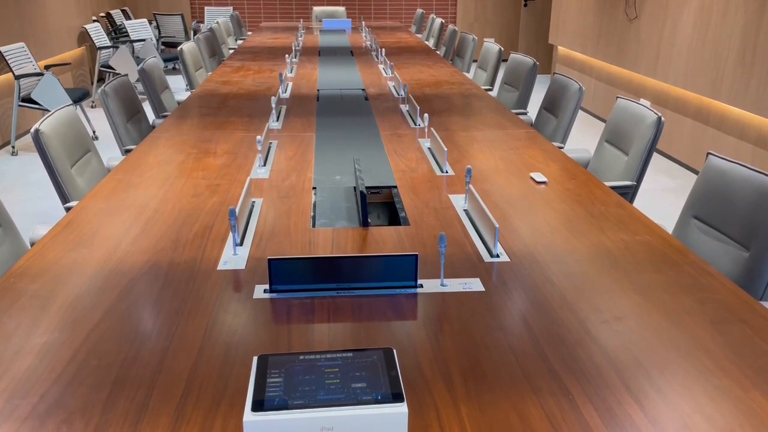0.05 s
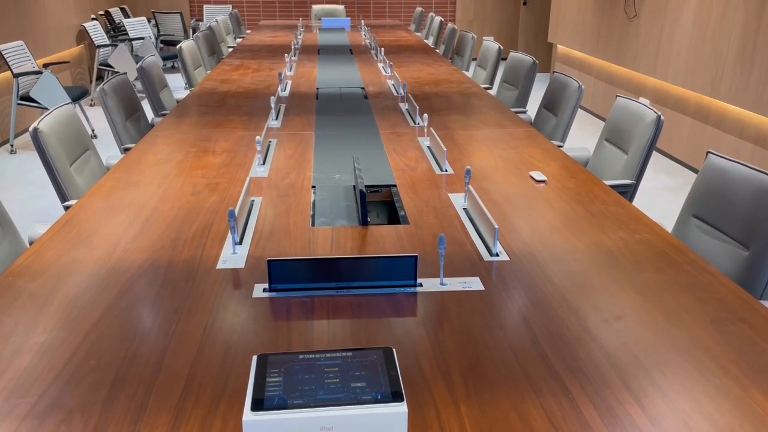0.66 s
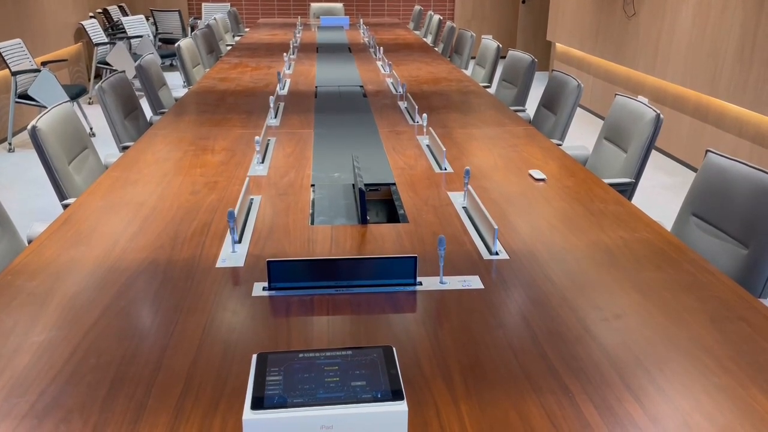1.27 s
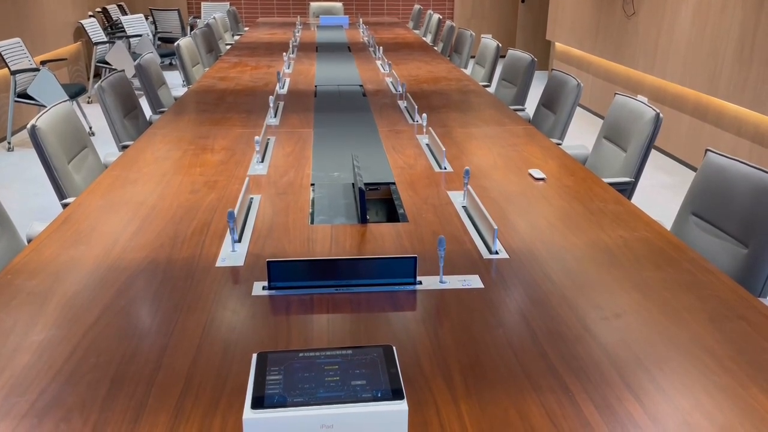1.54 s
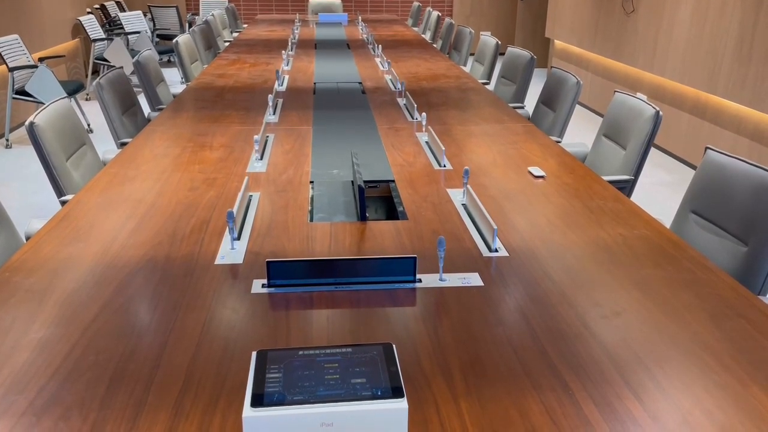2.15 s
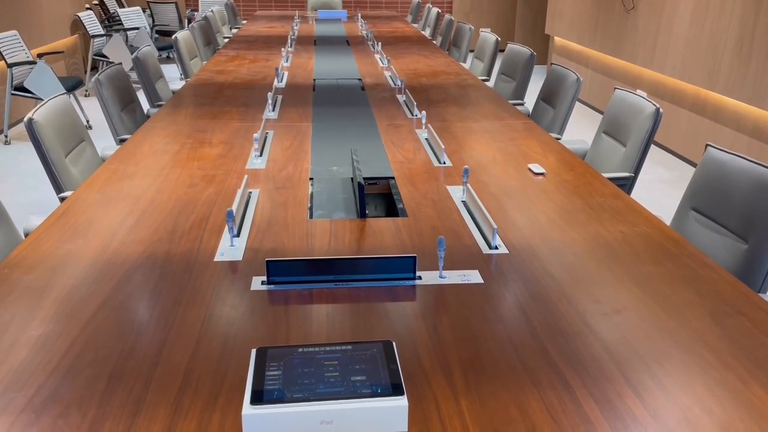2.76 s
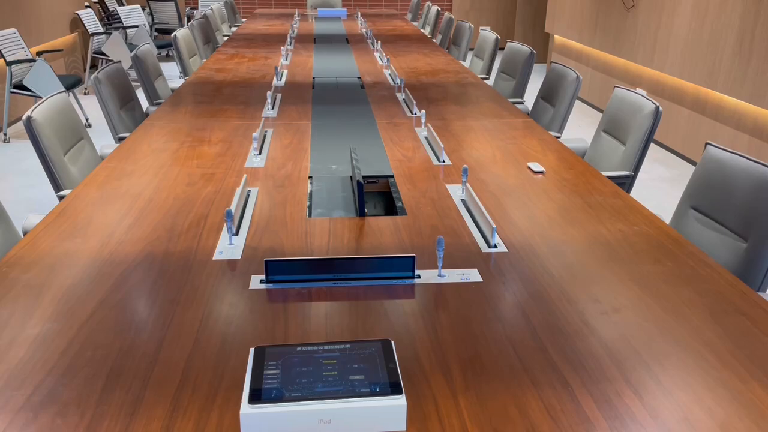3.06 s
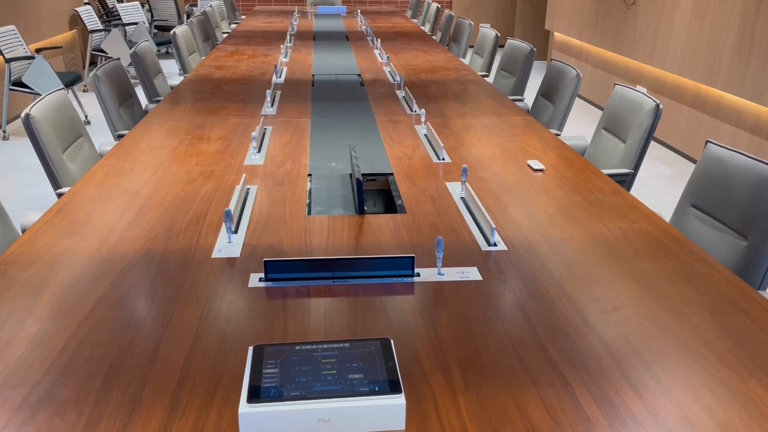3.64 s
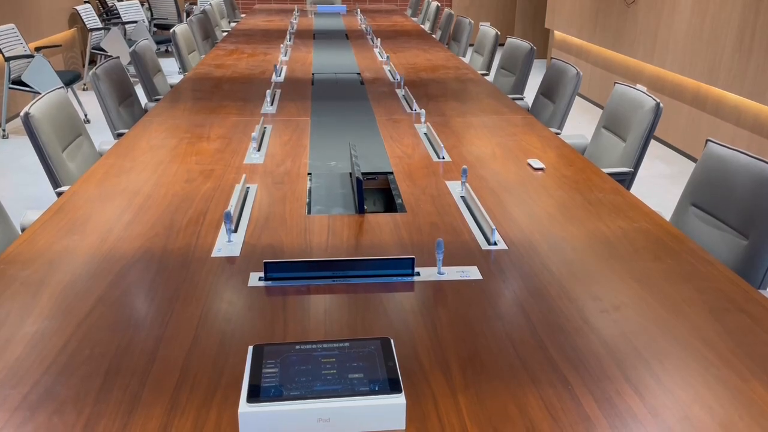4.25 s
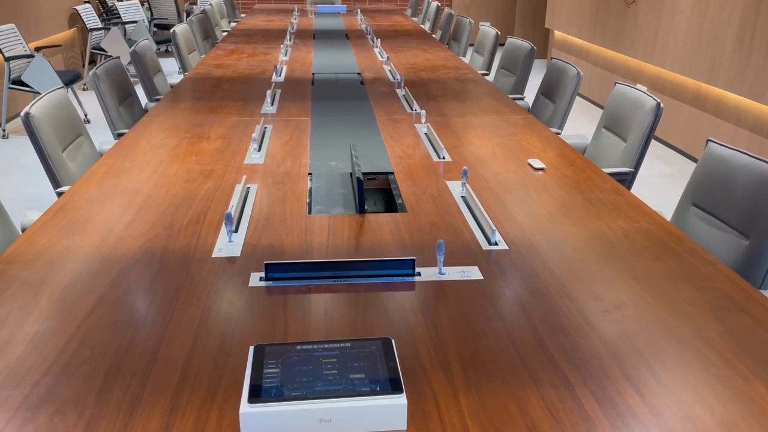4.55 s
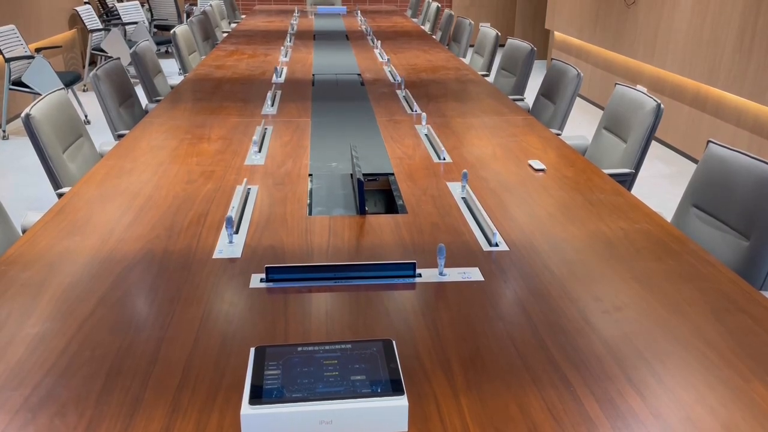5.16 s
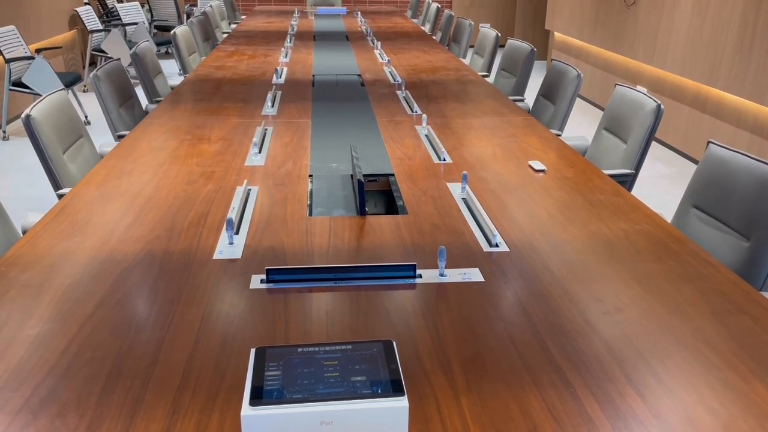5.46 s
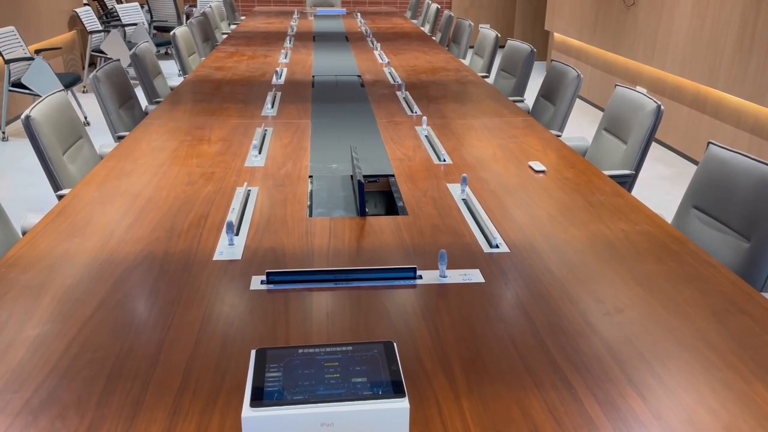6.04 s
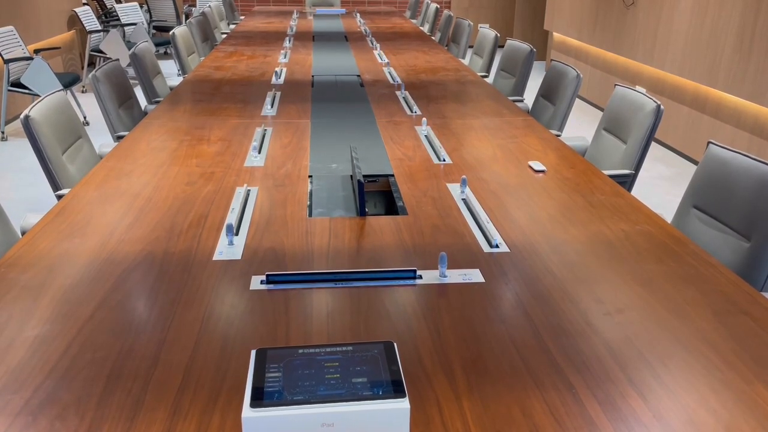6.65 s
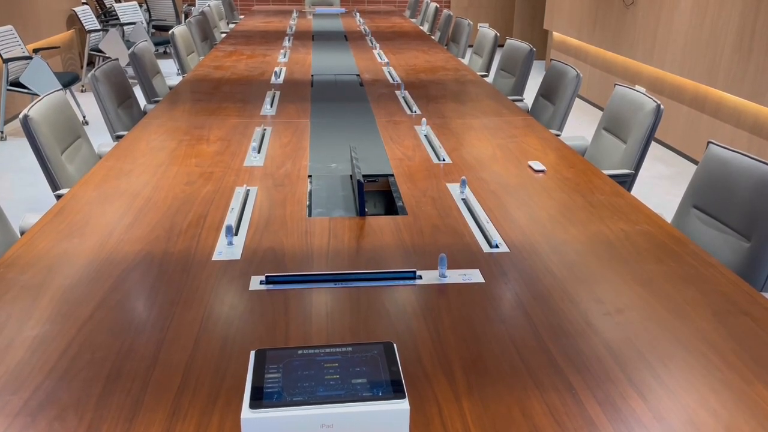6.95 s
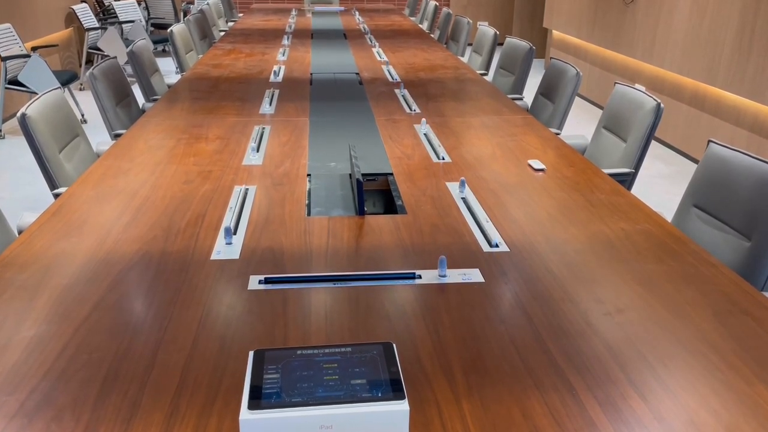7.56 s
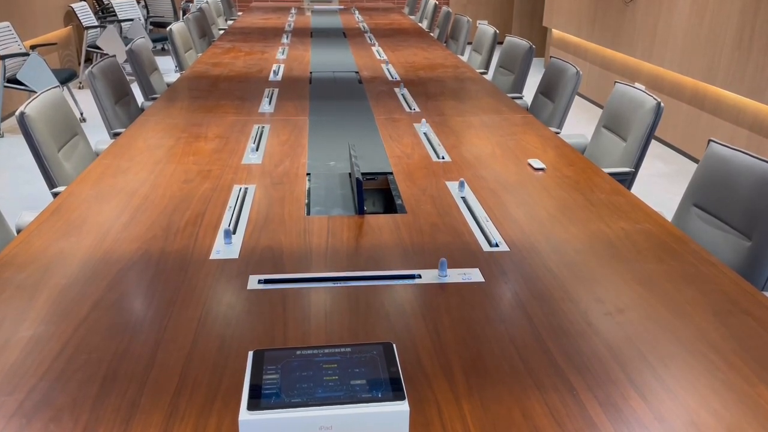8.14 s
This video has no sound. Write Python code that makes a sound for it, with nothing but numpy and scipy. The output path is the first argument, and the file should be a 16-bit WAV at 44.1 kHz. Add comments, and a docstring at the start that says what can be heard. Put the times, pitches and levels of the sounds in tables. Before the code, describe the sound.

A steady low electric hum with a faint gear whirr runs throughout as motorised screens sink into a long wooden conference table. It is heard from the head of the table in a quiet room with little echo, over softly murmuring ventilation. The hum is strongest for the first three seconds, then gradually eases, recovering slightly after 7 seconds. The panels brush faintly in their slots now and then, with one tiny squeal at about 0.7 seconds. Small bright ticks are scattered through the first half, clearest at 2.6 and 3.3 seconds. Light knocks come at about 2.4, 3.6 and 4.8 seconds. From 6.5 to 7.7 seconds a faint reedy whine sounds, breaking into a string of short squeals. The clearest knock, still soft, lands near 7.5 seconds, and a lighter one follows at 8.2 seconds while the hum continues.

```python
"""A low hum comes through a long wooden conference table in a quiet, carpeted room as screens sink into it.
Their synchronous motors turn in step with the mains, so the motor and gear tones are harmonics of one
rotation rate. Ventilation murmurs throughout. Sliding friction makes the panels brush in their slots,
and light impacts excite damped modes, heard as ticks and knocks. One brief squeal comes early; near
the end a faint reedy whine sounds for a second and breaks into short squeals."""
import sys
import numpy as np
from scipy import signal
from scipy.fft import rfft, irfft, next_fast_len
from scipy.io import wavfile

SR = 44100
rng = np.random.default_rng(int(sys.argv[2]) if len(sys.argv) > 2 else 0)


def wav_out(sig):
    """Save sig, one row per channel (or a flat mono array), as 16-bit PCM at SR to the path in sys.argv[1]."""
    wavfile.write(sys.argv[1], SR, np.round(np.clip(np.atleast_2d(sig).T, -1, 1) * 32767).astype(np.int16))


N = 366030
MAINS_HZ, TURNS_PER_S = 50, 50 / 6
ROOM_T60_S = 0.3


def from_db(db):
    """Amplitude ratio of a level in decibels."""
    return 10 ** (np.asarray(db) / 20)


def rms_one(x):
    """Normalisation to unit rms."""
    return x / np.sqrt(np.mean(x ** 2) + 1e-20)


def level_at(t, curve):
    """Linear interpolation of a curve of (t/s, level/dB)."""
    return np.interp(t, *np.transpose(curve))


def drift(rate_hz):
    """Random modulation: noise of unit rms, low-passed at rate_hz."""
    at = np.arange(0, N + 50, 50)
    hz = np.fft.rfftfreq(len(at), at[1] / SR)
    slow = irfft(rfft(rng.standard_normal(len(at))) / (1 + (hz / rate_hz) ** 2) ** 2, len(at))
    return np.interp(np.arange(N), at, rms_one(slow))


def swell(t, peak_s, length_s, attack_share=0.5):
    """Gaussian envelope of height 1, whose rise takes attack_share of its length."""
    width_s = length_s * np.where(t < peak_s, attack_share, 1 - attack_share)
    return np.exp(-((t - peak_s) / width_s) ** 2)


def tone(cycles):
    """Simple harmonic motion of unit rms and random starting phase."""
    return np.sqrt(2) * np.sin(2 * np.pi * (cycles + rng.random()))


def noise(spectrum):
    """Spectral shaping: noise that follows (f/Hz, level/dB in 1 Hz) and falls steeply outside it."""
    size = next_fast_len(N)
    hz = np.fft.rfftfreq(size, 1 / SR) + 0.00088   # the offset keeps the logarithm finite
    points, level_db = np.transpose(spectrum)
    gain = from_db(np.interp(np.log(hz), np.log(points), level_db))
    gain /= np.sqrt((1 + (points[0] / hz) ** 20) * (1 + (hz / points[-1]) ** 20))
    return irfft(rfft(rng.standard_normal(size)) * gain, size)[:N] * np.sqrt(SR / 2)


def resonance(hz, width_hz, force=None):
    """Forced vibration: one band of a force, white noise unless given, at unit rms."""
    if force is None:
        force = rng.standard_normal(N)
    band = signal.butter(2, [hz - width_hz / 2, hz + width_hz / 2], "band", fs=SR, output="sos")
    return rms_one(signal.sosfilt(band, force))


def impulses(strikes):
    """Impulsive excitation: one sample for each (t/s, level/dB)."""
    out = np.zeros(N)
    for s, db in strikes:
        out[round(s * SR)] += from_db(db)
    return out


def ringing(strikes, hz, t60):
    """Free vibration: one mode decays exponentially after each (t/s, level/dB)."""
    t = np.arange(SR // 10) / SR
    mode = from_db(-60 * t / t60) * np.sin(2 * np.pi * hz * t)
    return signal.oaconvolve(impulses(strikes), mode)[:N]


def room(x, wet_db):
    """Reverberation: a diffuse tail decays exponentially behind the direct sound."""
    t = np.arange(SR // 2) / SR
    tail = rng.standard_normal(len(t)) * from_db(-60 * t / ROOM_T60_S)
    return x + from_db(wet_db) * signal.fftconvolve(x, tail / np.linalg.norm(tail))[:N]


# main hum at four times the mains frequency, fading as the screens sink: t/s, level/dB
MAIN_HUM_CURVE = [(0, -34), (1.42, -34), (1.55, -35), (2.4, -34), (2.75, -35.3), (2.83, -36.5),
                  (2.92, -34.5), (3.55, -36.5), (3.8, -40), (4.0, -38), (4.38, -39), (4.48, -41.5),
                  (4.6, -40.5), (5.12, -42.5), (5.22, -38.5), (5.45, -45), (5.7, -43), (6.0, -46.5),
                  (6.25, -45), (6.325, -62), (6.39, -46), (6.48, -42), (6.7, -45), (7.05, -43.5),
                  (7.18, -46.5), (7.35, -40.5), (7.68, -41.5), (8.3, -39.5)]
# deep hum an octave below it: t/s, level/dB
DEEP_HUM_CURVE = [(0, -45.5), (0.5, -42), (1.0, -44.5), (1.3, -48), (1.5, -44.5), (2.0, -43.3), (2.7, -45),
                  (3.05, -42.5), (3.7, -42), (4.85, -43), (5.55, -47.5), (5.8, -44.5), (6.75, -46),
                  (7.0, -43), (7.28, -42), (7.46, -47.5), (7.62, -42.5), (7.8, -52), (7.92, -45.5),
                  (8.06, -52.5), (8.22, -45.5)]
# weaker lines of rotors and gears: order/(cycles per turn), level/dB
GEAR_LINES = [(6, -66), (8, -61), (9, -63.5), (10, -60.5), (20, -57), (30, -59), (32, -75.5), (33, -74.5),
              (34, -79.5), (36, -60.5), (40, -76), (42, -73.5), (43, -72.5), (45, -79.5), (47, -73.5),
              (48, -71), (50, -75), (60, -77), (70, -80.5)]


def motors(t, hum_gain_db=0.04, gear_gain_db=-0.2, flutter_db=-62):
    """Synchronous rotation: the rotors lock to the mains, so each line is a multiple of one rate."""
    deep_db = level_at(t, DEEP_HUM_CURVE) + hum_gain_db + 0.5 * drift(2.2)
    deep = from_db(deep_db) * tone(2 * MAINS_HZ * t)
    main_db = level_at(t, MAIN_HUM_CURVE) + hum_gain_db + 0.32 * drift(3.2)
    flutter = from_db(flutter_db) * drift(14)   # keeps its size, so it shows more as the hum fades
    main = (from_db(main_db) + flutter) * tone(4 * MAINS_HZ * t)
    # the load on the gears wavers, and each line with it
    gears = sum(from_db(db + 1.5 * drift(1.1)) * tone(order * TURNS_PER_S * t)
                for order, db in GEAR_LINES)
    return deep + main + from_db(gear_gain_db) * gears


def gear_chatter(t, level_db=-65, corner_hz=400, uneven_db=3.5):
    """Periodic excitation: tooth contacts recur each turn, a comb of harmonics muffled by the table."""
    orders = np.arange(28, 100)
    muffling = 1 + (orders * TURNS_PER_S / corner_hz) ** 4.1
    amplitudes = from_db(uneven_db * rng.standard_normal(len(orders))) / muffling
    turn = np.linspace(0, 1, 4096)
    one_turn = sum(amplitude * tone(order * turn) for order, amplitude in zip(orders, amplitudes))
    return from_db(level_db) * rms_one(np.interp(t * TURNS_PER_S % 1, turn, one_turn))


# whirr of the drive spindles: f/Hz, bandwidth/Hz, level/dB
SPINDLE_BANDS = [(1768, 26, -87), (2760, 60, -86)]


def drive(t, grumble_db=-59.5):
    """Narrow-band noise: the spindles whirr throughout; the gears grumble under load at mid-travel."""
    load = swell(t, peak_s=3.9, length_s=2.8)
    grumble = from_db(grumble_db) * load * resonance(hz=318, width_hz=60)
    whirr = sum(from_db(db) * resonance(hz, width) for hz, width, db in SPINDLE_BANDS)
    return whirr + grumble


# low murmur of ventilation and table: f/Hz, level/dB in 1 Hz
MURMUR_SPECTRUM = [(20, -86.5), (40, -82.5), (56, -70), (105, -69.5), (118, -74.5), (135, -71),
                   (160, -76.5), (197, -70.5), (225, -77), (285, -79), (308, -77), (365, -85.7), (480, -89),
                   (600, -93.5)]
# slow rise and fall of the murmur: t/s, gain/dB
MURMUR_CURVE = [(0, -1), (1.8, -0.9), (2.3, 0.6), (3.05, 1), (3.7, -0.5), (4.4, -0.5), (5.5, 1.3),
                (5.9, -1.8), (7.25, 0), (8.3, -1.5)]
# air hiss: f/Hz, level/dB in 1 Hz
AIR_SPECTRUM = [(600, -92.5), (830, -93), (1100, -98.5), (1550, -100.2), (2350, -104.9), (2780, -104.7),
                (3400, -116), (4400, -123), (5300, -128), (6500, -131), (8150, -139.5), (9500, -133),
                (12400, -131), (14000, -139)]
# fan tones that beat against the motors: f/Hz, level/dB
FAN_LINES = [(251.75, -69.5), (302.9, -66.5)]
# thin whistles of the electronics: f/Hz, level/dB
ELECTRONIC_LINES = [(11778, -107), (11800, -105), (12200, -107), (12617, -111)]


def ventilation_and_electronics(t, waver_db=0.5):
    """Superposition: broadband air noise lies under the faint line spectra of fans and electronics."""
    lines = sum(from_db(db + waver_db * drift(1.0)) * tone(hz * t)
                for hz, db in FAN_LINES + ELECTRONIC_LINES)
    murmur = from_db(level_at(t, MURMUR_CURVE)) * noise(MURMUR_SPECTRUM)
    return murmur + noise(AIR_SPECTRUM) + lines


# hiss of a panel in its slot: f/Hz, relative level/dB
BRUSH_SPECTRUM = [(2400, -10.5), (3300, 3), (3900, 3.5), (4700, -2), (5300, -6.5), (6200, -8.5),
                  (8000, -25.5), (12000, -25)]
# harder rubs: t/s at the peak, level/dB, duration/s, f/Hz of the panel's ring
SLOT_RUBS = [(0.01, -75.5, 0.12, 5100), (0.22, -78, 0.2, 4680), (0.71, -87, 0.13, 5200),
             (1.429, -85, 0.51, 3920), (1.95, -88.5, 0.16, 4000), (2.64, -84, 0.37, 4370),
             (3.1, -86.5, 0.71, 4800), (4.08, -88.5, 0.22, 3990), (4.81, -86, 0.35, 4900),
             (5.75, -92, .25, 3770), (6.137, -85, 0.3, 3940), (6.55, -84.5, 0.23, 4600),
             (6.83, -84.5, 0.29, 4600), (7.86, -81, 0.21, 4500)]


def brushing(t, slide_db=-91, rise_db_per_s=0.83, ring_db=-4, ring_width_hz=1000):
    """Sliding friction: panels hiss past the lips of their slots, and harder rubs make them ring."""
    hiss = rms_one(noise(BRUSH_SPECTRUM))
    friction = rng.standard_normal(N)
    # light contact between the rubs grows as the panels go down
    power = from_db(slide_db + rise_db_per_s * t + drift(6.9)) ** 2
    rings = 0
    for s, db, length, hz in SLOT_RUBS:
        force = from_db(db) * swell(t, s, length, attack_share=0.22)
        power += force ** 2   # incoherent sources add in power
        rings += force * resonance(hz, ring_width_hz, friction)
    grain = from_db(1.5 * drift(36))
    return (np.sqrt(power) * hiss + from_db(ring_db) * rings) * grain


# drags of a panel: t/s at the peak, level/dB, duration/s
PANEL_DRAGS = [(0.301, -72.5, .6), (1.53, -70, .24), (4.78, -72, .25)]
# modes of a panel's face: f/Hz, bandwidth/Hz, gain/dB
PANEL_MODES = [(850, 260, 1), (1580, 160, -9), (2710, 260, -9)]


def dragging(t):
    """Resonance: friction swells now and then and drives the modes of a panel's whole face."""
    force = sum(from_db(db) * swell(t, s, length) for s, db, length in PANEL_DRAGS)
    return force * sum(from_db(db) * resonance(hz, width) for hz, width, db in PANEL_MODES)


# tiny bright ticks: t/s, level/dB of the snap, level/dB of the latch's ring
TICK_EVENTS = [(.125, -80, -83), (.15, -80, -81), (.68, -83.5, -88), (2.006, -77, -76),
               (2.5668, -71.5, -67), (3.083, -79.5, -79), (3.2965, -66.5, -64), (4.187, -79, -80)]
# a second contact and an early reflection of a tick: delay/s, gain/dB
TICK_REPEATS = [(.0027, -2.5), (0.0163, -6)]
# noise of a snap: f/Hz, relative level/dB
SNAP_SPECTRUM = [(3800, -11.5), (5200, -2), (6500, -3), (8200, -13.5), (10300, -6.5), (11600, 2),
                 (13000, 1), (14000, -0.5)]
# modes of the latch: f/Hz, gain/dB, T60/s
LATCH_MODES = [(4600, -4.5, .009), (5300, -1, .008), (6400, -4.5, .007), (11900, -5, .007)]


def ticks(decay_s=0.00083, tail_db=1.5, latch_gain_db=-1.5):
    """Transient excitation: sharp snaps, each with a quick second contact, ring a latch, followed by an early
    reflection and reverberation."""
    paths = [(0.0011, 0)] + TICK_REPEATS   # the direct path comes first
    arrivals = impulses([(s + delay, db + gain) for s, db, _ in TICK_EVENTS for delay, gain in paths])
    envelope = signal.lfilter([1], [1, -np.exp(-1 / (decay_s * SR))], arrivals + 1e-18)
    retained = from_db(-60 / (ROOM_T60_S * SR)) ** 2   # share of the room's energy left after a sample
    tail_power = signal.lfilter([1 - retained], [1, -retained], envelope ** 2) * from_db(tail_db) ** 2
    snaps = np.sqrt(envelope ** 2 + tail_power) * rms_one(noise(SNAP_SPECTRUM))
    strikes = [(s + delay, db + gain) for s, _, db in TICK_EVENTS for delay, gain in paths[:2]]
    latch = sum(from_db(db + latch_gain_db) * ringing(strikes, hz, t60) for hz, db, t60 in LATCH_MODES)
    return snaps + room(latch, wet_db=-5)


# partials of the whine, shifting as the panel sinks: harmonic, level/dB at mid-whine, slope/(dB/s)
WHINE_HARMONICS = [(5, -79.5, 1.5), (6, -78.5, -1), (7, -77, 1), (8, -80.5, -1.5), (9, -87.5, 2.5),
                   (11, -93, -6.5), (12, -102, -0.5), (13, -104, -3.5)]
# squeals of a slide: t/s at the peak, harmonic, level/dB, duration/s
SLIDE_SQUEALS = [(.66, 7, -75, 0.032), (6.51, 7, -72, 0.03), (6.577, 7, -70, 0.1), (6.645, 8, -68, 0.072),
                 (6.79, 8, -73, 0.054), (6.845, 6, -70, 0.025), (6.912, 8, -69.5, 0.045),
                 (6.967, 8, -67.5, 0.029), (7.01, 8, -74, 0.064), (7.095, 7, -70, 0.049),
                 (7.142, 6, -67.5, 0.039), (7.172, 7, -64, 0.07), (7.224, 7, -67, 0.03),
                 (7.266, 8, -67, 0.022), (7.289, 9, -80.5, 0.23), (7.296, 5, -67, 0.02),
                 (7.317, 7, -64, 0.031), (7.482, 6, -73, 0.06)]


def squeals_and_whine(t, pitch_hz=420.4, rasp_hz=37, squeal_gain_db=-0.6,
                      start_s=6.47, end_s=7.69, attack_s=0.069, release_s=0.32):
    """Amplitude modulation roughens a harmonic series into a reedy whine; single partials squeal."""
    cycles = np.cumsum(pitch_hz + 0.73 * drift(4.48)) / SR
    rasp_cycles = np.cumsum(rasp_hz + 5 * drift(6.0)) / SR
    envelope = np.clip(np.minimum((t - start_s) / attack_s, (end_s - t) / release_s), 0, 1)
    from_middle_s = np.clip(t, start_s, end_s) - (start_s + end_s) / 2
    out = 0
    for harmonic, db, db_per_s in WHINE_HARMONICS:
        flutter = drift(25) + 1j * drift(25)   # complex: both amplitude and phase flutter
        rasp = tone(rasp_cycles)
        modulation = 1 + flutter + 0.51 * rasp
        modulation /= np.sqrt(np.mean(np.abs(modulation) ** 2))
        whine = from_db(db + db_per_s * from_middle_s) * envelope * modulation
        swells = sum(from_db(peak_db + squeal_gain_db) * swell(t, s, length)
                     for s, partial, peak_db, length in SLIDE_SQUEALS if partial == harmonic)
        squeal = swells * (1 + 0.2 * flutter + 0.23 * rasp)
        carrier = np.exp(2j * np.pi * harmonic * cycles)
        out += np.sqrt(2) * np.real((whine + 1j * squeal) * carrier)   # the two add in quadrature
    return out


# light knocks of the lifts: t/s, level/dB, hardness as spectral tilt/(dB per octave)
LIFT_KNOCKS = [(2.438, -52, -1), (3.617, -48.5, 5), (4.773, -51, -3), (7.431, -53, -1), (7.458, -42, -3.5),
               (7.497, -52, -5), (8.227, -50.5, -3.5)]
# modes of the lift housing: f/Hz, gain/dB, T60/s
HOUSING_MODES = [(486, -7, 0.018), (725, -1, 0.013), (880, -3, 0.021), (1410, -7, 0.011), (2080, -14, 0.01),
                 (2550, -20.5, .006)]


def knocks(padding_hz=2720):
    """Impact excitation: each knock rings the housing, and a harder contact favours the upper modes."""
    pivot_hz = HOUSING_MODES[1][0]
    housing = 0
    for hz, db, t60 in HOUSING_MODES:
        octaves = np.log2(hz / pivot_hz)
        strikes = [(s, knock_db + db + tilt * octaves) for s, knock_db, tilt in LIFT_KNOCKS]
        housing += ringing(strikes, hz, t60)
    padding = signal.butter(4, padding_hz, fs=SR, output="sos")   # padded contacts pass little treble
    return room(signal.sosfilt(padding, housing), wet_db=-11)


def scene():
    """Linear superposition: the pressures of all sources add at the head of the table."""
    t = np.arange(N) / SR
    continuous = motors(t) + gear_chatter(t) + drive(t) + ventilation_and_electronics(t)
    contacts = brushing(t) + dragging(t) + ticks() + squeals_and_whine(t) + knocks()
    return (continuous + contacts)[None]


def record(dry, fade_s=0.002, cutoff_hz=14100):
    """Windowing and band limiting: brief fades at both ends, then a steep low-pass filter."""
    samples_from_edge = np.minimum(np.arange(N), np.arange(N)[::-1])
    fade = np.clip(samples_from_edge / (fade_s * SR), 0, 1)
    low_pass = signal.ellip(10, .1, 80, cutoff_hz, fs=SR, output="sos")
    return signal.sosfilt(low_pass, dry * fade)


dry = scene()
out = record(dry)
wav_out(out)
```